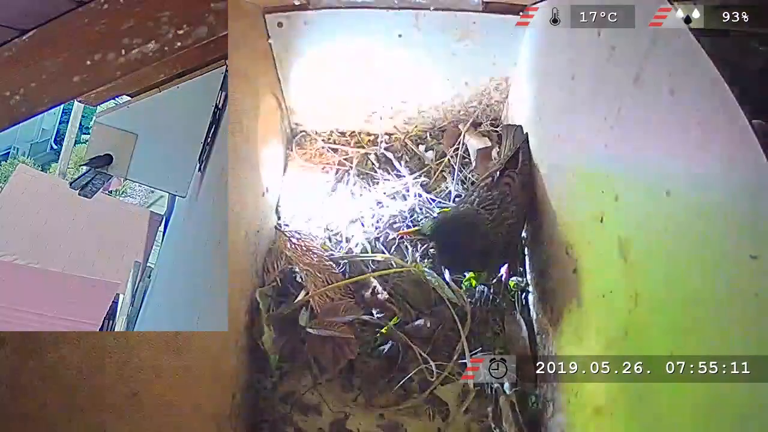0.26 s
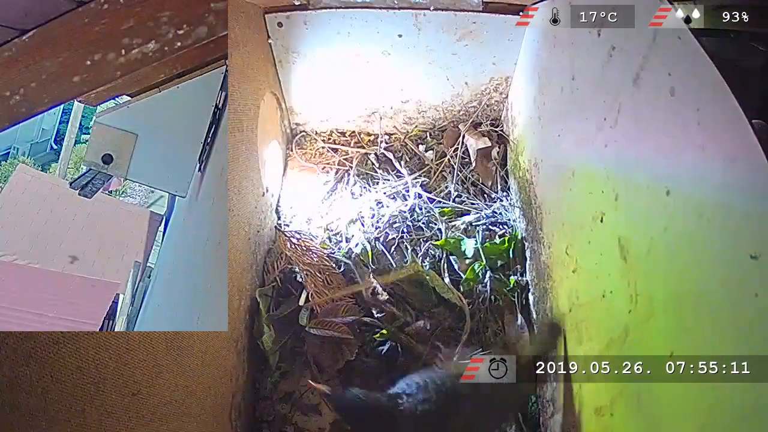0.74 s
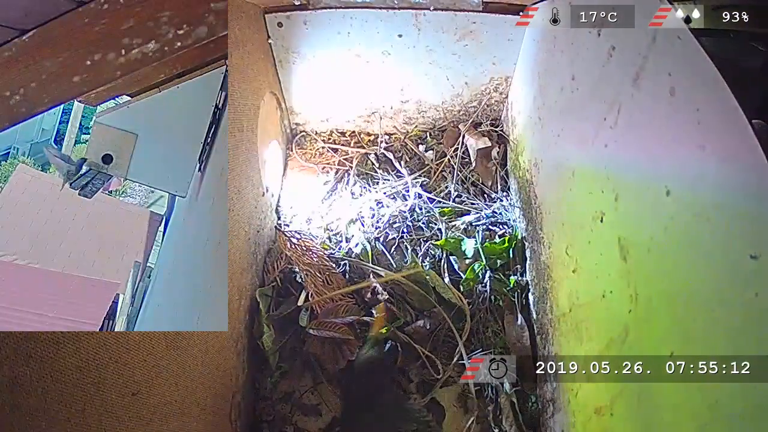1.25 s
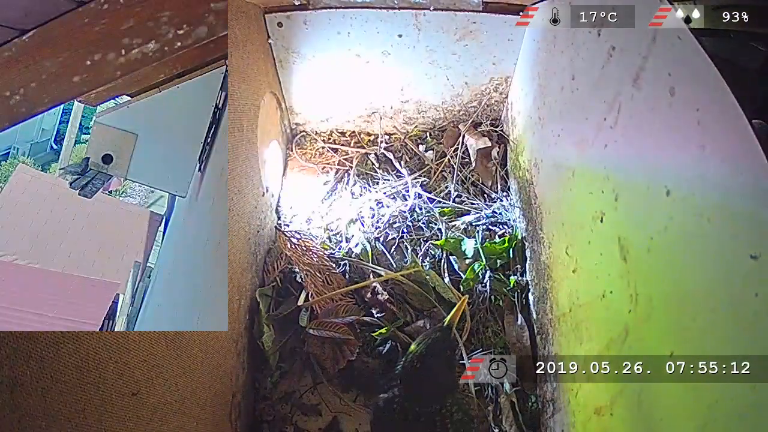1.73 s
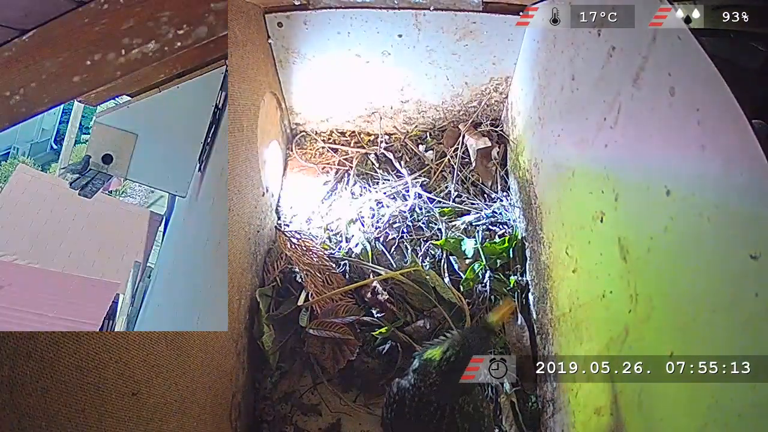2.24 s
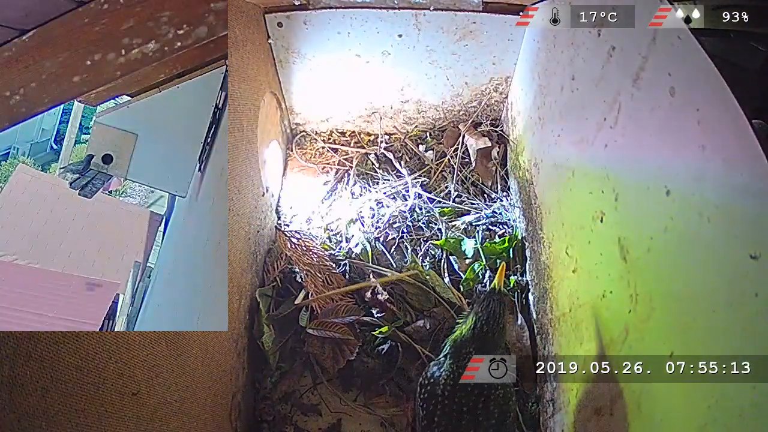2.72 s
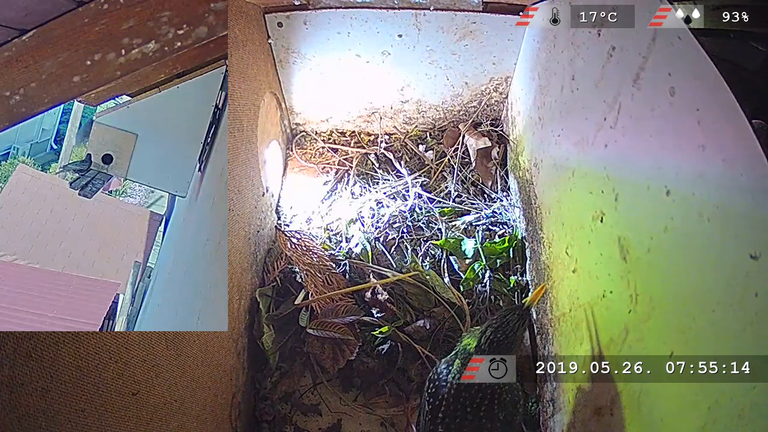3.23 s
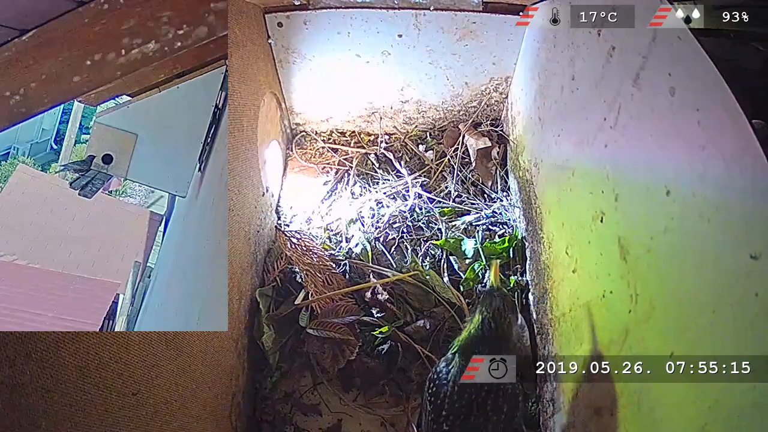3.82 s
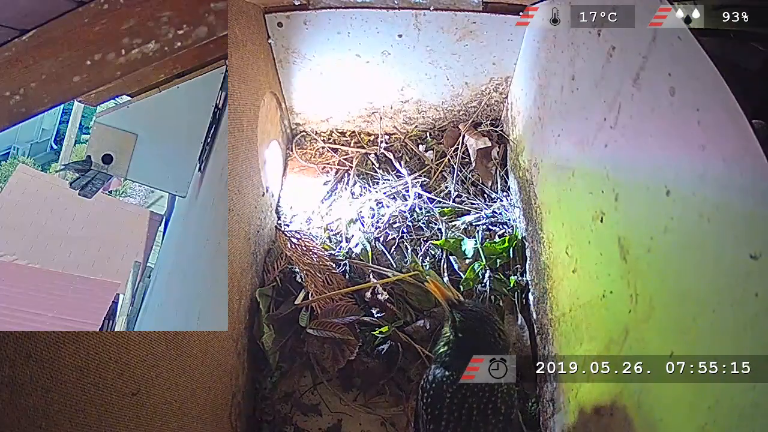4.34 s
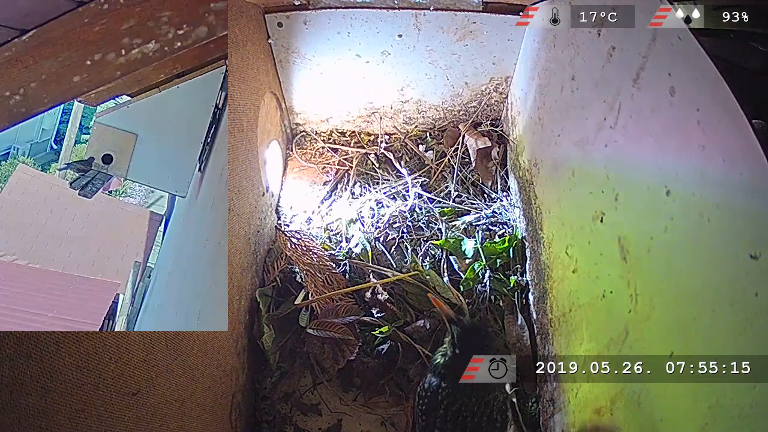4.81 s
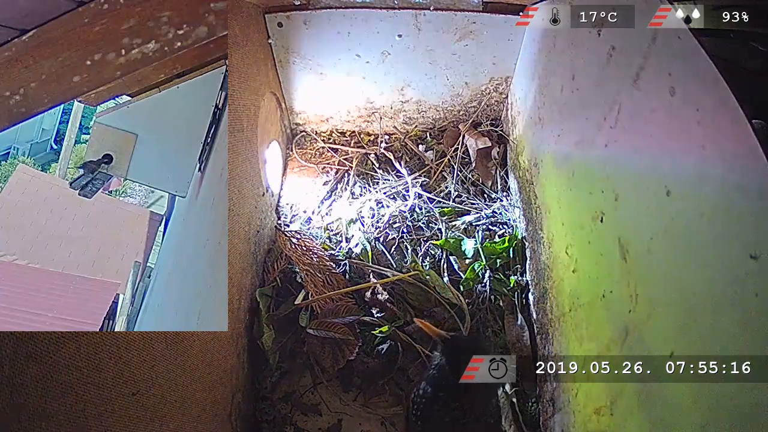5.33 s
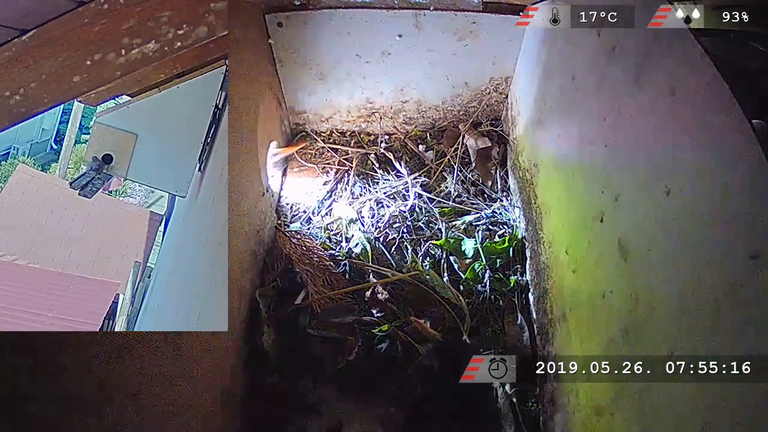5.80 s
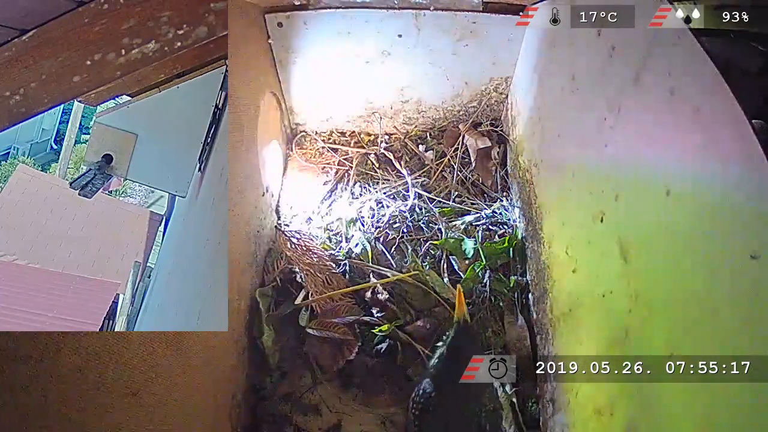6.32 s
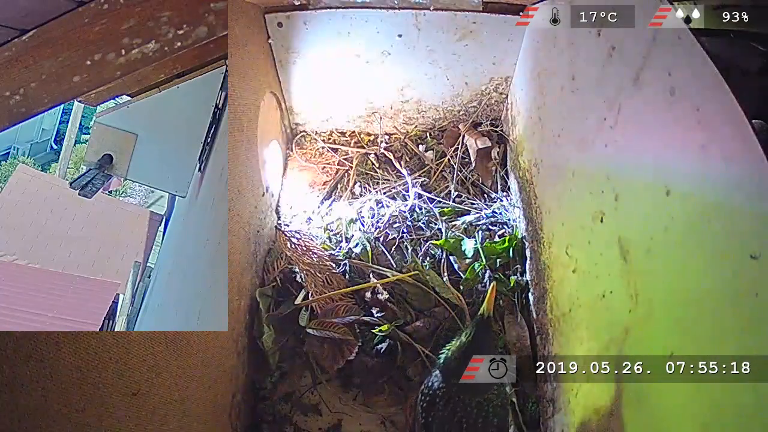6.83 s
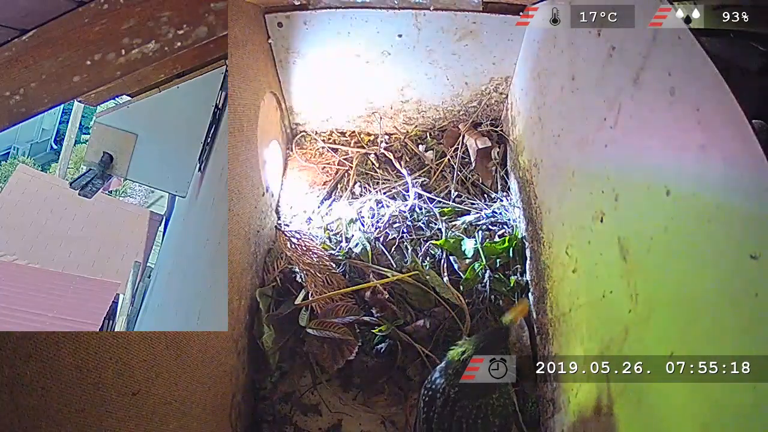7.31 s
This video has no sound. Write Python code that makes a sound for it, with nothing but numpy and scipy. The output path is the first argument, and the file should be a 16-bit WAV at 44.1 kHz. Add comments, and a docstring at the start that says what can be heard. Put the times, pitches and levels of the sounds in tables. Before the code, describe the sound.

Close in a small wooden box, a starling whistles long and loud, then breaks into chattering chirps, clucks, quacks, rasps and a screech.

```python
"""A clear whistle rises out of faint outdoor noise and low box rumble: a starling sings inside a wooden nest box.
The two sides of its syrinx are gliding near-sines; fast flutter makes buzzes and shaken pitch makes rough notes.
Snaps and air noise ring resonances for rasps; short pushes ring clucks and steps; random ticks make rustles.
The box adds a very short ring, and its standing waves make gliding notes dip.
The loudest notes overload the box camera's input, which flattens, crackles, fizzes and thumps."""
import sys
import numpy as np
from scipy import signal
from scipy.fft import rfft, irfft
from scipy.io import wavfile
from scipy.ndimage import uniform_filter1d

SR = 44100
rng = np.random.default_rng(int(sys.argv[2]) if len(sys.argv) > 2 else 0)


def to_wav(sig):
    """Store sig (one row per channel, or 1-D mono) as 16-bit WAV at the path in sys.argv[1].

    Samples outside -1..1 are clipped; the rate is SR.
    """
    pcm = np.clip(np.atleast_2d(sig), -1, 1) * 32767
    pcm = np.round(pcm).astype(np.int16)
    wavfile.write(sys.argv[1], SR, pcm.T)  # frames by channels


N = 333396
T = np.arange(N) / SR


def undb(db):
    """Decibels to gain."""
    return 10 ** (np.asarray(db) / 20)


def unit(x):
    """Scale to rms 1."""
    return x / np.sqrt(np.mean(x ** 2) + 1e-18)


def wander(count, rate_hz):
    """Low-passed random motion of rms 1."""
    sos = signal.butter(2, min(rate_hz, SR / 4), fs=SR, output="sos")
    return unit(signal.sosfilt(sos, rng.standard_normal(count)))


def colour(hz, points):
    """Gain at the given frequencies from a (hz, db) curve."""
    point_hz, point_db = np.transpose(points)
    return undb(np.interp(np.log(hz + 1), np.log(point_hz), point_db))


def resonate(x, modes):
    """Parallel resonances; alternate signs keep the valleys between them free of notches."""
    total = 0
    for k, (hz, width_hz, db) in enumerate(modes):
        b, a = signal.iirpeak(hz, hz / width_hz, fs=SR)
        total = total + (-1) ** k * undb(db) * signal.lfilter(b, a, x)
    return total


def gesture(rows):
    """Sample a note's rows: times, a 3 ms fade at both ends, then each column."""
    row_s, *columns = np.transpose(rows)
    t = T[(T >= row_s[0]) & (T <= row_s[-1])]
    fade = np.clip(np.minimum(t - t[0], t[-1] - t) / .003, 0, 1)
    return (t, fade, *(np.interp(t, row_s, c) for c in columns))


def figure(shape, start_s, length_s, pitch_factor, level_db):
    """One rendition of a repeated figure: moved, stretched, transposed and made louder or softer."""
    return np.multiply(shape, (length_s, pitch_factor, 1)) + (start_s, 0, level_db)


def place(t, x):
    """Lay a note into silence at its own time."""
    return np.pad(x, (round(t[0] * SR), N))[:N]


def phase_of(hz):
    """Running phase of a moving pitch."""
    return 2 * np.pi * np.cumsum(hz) / SR


def swells(rows):
    """Gain that rises to each row's level and dies away again, exponentially both ways."""
    return sum(undb(level_db) * np.exp(-np.abs(T - peak_s) / rise_fall_s)
               for peak_s, level_db, rise_fall_s in rows)


BOX_T60_S, BOX_LATE_T60_S, BOX_LATE_DB = 0.067, 0.16, -26


def in_box(x, wet_db):
    """Direct sound plus the dense, quickly dying reflections of the box."""
    t = T[:SR // 4]
    decay = undb(-60 * t / BOX_T60_S) + undb(BOX_LATE_DB - 60 * t / BOX_LATE_T60_S)
    ring = rng.standard_normal(len(t)) * decay * (t > .001)
    ring /= np.linalg.norm(ring)
    wet = undb(wet_db)
    return (x + wet * signal.fftconvolve(x, ring)[:N]) / np.hypot(1, wet)


# outdoor noise and microphone hiss, relative spectrum: freq_hz, density_db
BACKGROUND_SPECTRUM = [(18, -39), (30, -8), (87, 1.5), (330, -15.5), (520, -7.5), (952, -20.5), (1320, -27),
                       (1620, -20.5), (1930, -20.5), (2890, -31), (3200, -23), (5570, -32), (12500, -32.5),
                       (16200, -65), (22000, -120)]
# rumble as the bird moves about: peak_s, level_db, rise_fall_s
STIRS = [(.1, -61.5, .4), (1.41, -36.5, .14), (7.54, -37.5, 0.075)]
BACKGROUND_DB, RUMBLE_REST_DB = -58, -74


def background():
    """Faint, swelling shaped noise, and noise through two low resonances for the rumble of the box."""
    bin_hz = np.arange(N // 2 + 1) * SR / N
    spectrum = rfft(rng.standard_normal(N)) * colour(bin_hz, BACKGROUND_SPECTRUM)
    air = unit(irfft(spectrum, N))
    rumble = resonate(rng.standard_normal(N), [(47.4, 13, 0)])
    rumble = unit(resonate(rumble, [(48, 130, 0)]))
    swell = undb(2 * wander(N, 4))
    return air * swell * undb(BACKGROUND_DB) + rumble * (undb(RUMBLE_REST_DB) + swells(STIRS))


# standing-wave nulls of the box: centre_hz, width_hz, depth_db
BOX_NULLS = [(2333.6, 45, -21), (3138, 42, -15.5), (3477, 32, -15), (3920, 48, -23.5), (4010, 8.8, -13),
             (4184, 24, -3), (4312, 25, -16.5), (4615, 55, -25), (5722, 67, -7.5), (5880, 71, -10),
             (6604, 70, -12), (8280, 120, -17)]


def nulls_db(hz):
    """Level lost to the box's standing waves at each pitch."""
    return sum(db / (1 + (2 * (hz - centre_hz) / width_hz) ** 2) for centre_hz, width_hz, db in BOX_NULLS)


# a restless share of each whistle is scattered by the nest and fills the nulls
SCATTER_DB, SCATTER_HZ = -23.5, 60


def whistle(rows, second_db=-36, half_db=-90, flutter=0.036, flutter_hz=370, jitter=.0015,
            waver_db=0, waver_hz=22):
    """One side of the syrinx: a near sine; flutter adds sidebands, period doubling adds half lines."""
    t, fade, hz, db = gesture(rows)
    beat = phase_of(flutter_hz * (1 + 0.3 * wander(len(t), 120)))
    phase = phase_of(hz * (1 + jitter * wander(len(t), 200))) + flutter * np.sin(beat)
    third = 0.31 * (3 * hz < SR / 2) * np.sin(3 * phase)
    tone = np.sin(phase) + undb(second_db) * (np.sin(2 * phase) + third)
    tone += undb(half_db) * (np.sin(phase / 2) + .2 * np.sin(3 * phase / 2))
    level_db = db + waver_db * np.minimum(wander(len(t), waver_hz), 1)
    path = undb(nulls_db(hz)) + undb(SCATTER_DB) * wander(len(t), SCATTER_HZ)
    flutter_gain = 1 + .5 * flutter * np.sin(beat + 1)
    return place(t, np.sqrt(2) * tone * fade * undb(level_db) * path * flutter_gain)


# pure whistles, one curve a note, levels before the nulls: time_s, pitch_hz, level_db
LONG_WHISTLE = [(0, 2450, -55), (.07, 2700, -43.5), (.1, 2975, -29.5), (.125, 3178, -31.5),
                (.21, 3338, -31), (.28, 3270, -19.5), (.335, 3230, -13), (.42, 3178, -20), (.56, 3089, -18),
                (.62, 3072, -13.4), (.7, 3060, -13.9), (.82, 3040, -18), (.93, 3012, -16),
                (1.04, 3022, -18.5), (1.075, 3030, -61)]
SLIDE = [(1.55, 4900, -55), (1.57, 4730, -22.5), (1.6, 4693, -14.5), (1.7, 4370, -13.5),
         (1.83, 4102, -13.5), (1.89, 3980, -17.5), (1.915, 4048, -20.5), (1.93, 4190, -34.5),
         (2.065, 4254, -44), (2.09, 4120, -66.5)]
ARCH = [(2.29, 5440, -69), (2.386, 5650, -27), (2.485, 6300, -24.5), (2.55, 7744, -24), (2.605, 8725, -32),
        (2.65, 7800, -16.5), (2.696, 6460, -14.5), (2.751, 5530, -15.5), (2.81, 5004, -16),
        (2.837, 4963, -38.5), (2.87, 4980, -40.5)]
LEAD_IN = [(3.215, 5360, -68), (3.249, 5640, -36), (3.289, 5450, -29.5), (3.335, 5710, -33)]
LAST_WHISTLE = [(7.43, 3300, -51), (7.452, 3280, -30), (7.47, 3440, -22), (7.515, 3600, -17.5),
                (7.53, 3600, -16.5), (7.56, 3180, -26)]


def whistles():
    """The clear single notes: near-sines with weak harmonics and slight flutter."""
    song = whistle(LONG_WHISTLE, second_db=-39, flutter=0.027, jitter=.0012)
    song += whistle(SLIDE, second_db=-28.0)
    song += whistle(ARCH, second_db=-25.5, flutter=0.12)
    song += whistle(LEAD_IN, second_db=-24.5, flutter=0.25)
    return song + whistle(LAST_WHISTLE, second_db=-35.5)


# twigs and leaves shift under the bird: peak_s, level_db, rise_fall_s
RUSTLES = [(.15, -52.5, 0.18), (1.43, -54.5, 0.27), (4.2, -63.5, 0.27), (6.33, -65.5, 0.29)]
# their resonances: freq_hz, width_hz, gain_db
TWIG_MODES = [(500, 220, 0.5), (900, 420, -2), (3180, 1100, -13), (9500, 5000, -15.5)]


def rustle(ticks_per_s=500, scatter_db=5):
    """Dry nest material: random ticks of either sign ring broad resonances as the bird shifts."""
    tick_db = scatter_db * np.minimum(rng.exponential(size=N), 4)
    ticks = (rng.random(N) < ticks_per_s / SR) * undb(tick_db)
    return unit(resonate(ticks * rng.choice([-1, 1], N), TWIG_MODES)) * swells(RUSTLES)


def rough_note(rows, second_db, jitter, shimmer):
    """A tone that turns chaotic: pitch and strength shake, and the octave grows with the roughness."""
    t, fade, hz, db, rough = gesture(rows)
    phase = phase_of(hz * (1 + jitter * rough * wander(len(t), 350)))
    overtones = np.sin(2 * phase) + 0.17 * np.sin(3 * phase)
    tone = np.sin(phase) + undb(second_db) * (rough + 0.088) * overtones
    shake = (1 + shimmer * rough * wander(len(t), 450)) / np.hypot(1, shimmer * rough)
    return place(t, np.sqrt(2) * tone * shake * fade * undb(db))


# soft notes of the second voice, one list a note: time_s, pitch_hz, level_db, roughness
ASIDES = [
    [(.078, 4080, -47.5, 0.3), (.102, 5570, -39.5, 0), (.135, 6850, -70, .2)],
    [(.185, 4500, -59, .5), (.2, 3500, -37.5, 0.4), (.24, 2300, -48, 0.7), (.33, 1450, -45, .8)],
    [(.825, 1840, -45, 0.1), (.87, 1785, -55.5, .3)],
    [(1.015, 1806, -54.5, 0.05), (1.06, 1740, -45.5, 0.42)],
    [(2.607, 5060, -28, 0.1), (2.62, 4655, -21, 0.06), (2.645, 3920, -35, 0.7), (2.665, 3300, -41.5, 0.4),
     (2.72, 2000, -44, 0.15), (2.82, 1080, -55, 0.12)],
]


def asides():
    """Soft rough notes from the other side of the syrinx, under the whistles."""
    return sum(rough_note(rows, second_db=-35, jitter=.035, shimmer=.8) for rows in ASIDES)


# air through the syrinx, one list a wheeze: time_s, centre_hz, level_db
WHEEZES = [
    [(.24, 4710, -65), (.34, 4525, -39.5), (.5, 4464, -62), (.62, 4300, -45)],
    [(.08, 3000, -60), (.33, 3093, -42.5), (.6, 3030, -59), (1.05, 3045, -66)],
    [(1.09, 4265, -53), (1.19, 4535, -35), (1.38, 3084, -42), (1.45, 2940, -61)],
]


def wheezes(cutoff_hz=650):
    """Low-passed noise on a gliding carrier: a band of hiss that slides along beside a whistle."""
    song = np.zeros(N)
    for rows in WHEEZES:
        t, fade, hz, db = gesture(rows)
        hiss = unit(wander(len(t), cutoff_hz) * np.sin(phase_of(hz)))
        song += place(t, fade * undb(db) * hiss)
    return song


def knock(start_s, peak_db, decay_s, grit, modes):
    """A push with a gritty tail rings a set of resonances."""
    t = T[:SR // 4]
    push = grit * rng.standard_normal(len(t)) * np.exp(-t / decay_s)
    push[0] += 1
    ring = resonate(push, modes)
    return place(t + max(start_s, 0), undb(peak_db) * ring / np.abs(ring).max())


# clucks, relative level: start_s, relative_db
CLUCKS = [(.158, -58), (.414, -46), (3.118, -46), (3.203, -41.5), (3.946, -51.5), (4.056, -50.5),
          (4.337, -54.5), (4.374, -48.5), (4.662, -50), (4.822, -44.5), (4.867, -48.5), (4.996, -43.5),
          (5.132, -56.5), (7.189, -44.5), (7.391, -52)]
# throat resonances of a cluck: freq_hz, width_hz, gain_db
CLUCK_MODES = [(493, 133, 3.5), (920, 254, -3.5), (1360, 36, -7.5), (1710, 570, -15.5), (2730, 440, -21)]


def clucks():
    """Dry clucks: short gritty pushes ring the throat."""
    return undb(19.5) * sum(knock(s, db, decay_s=.004, grit=.12, modes=CLUCK_MODES) for s, db in CLUCKS)


# two-voice note, one curve a side of the syrinx, before the nulls: time_s, pitch_hz, level_db
DUET_LOW = [(1.165, 3130, -44), (1.184, 3330, -32), (1.39, 3690, -32), (1.435, 3824, -23),
            (1.48, 3975, -25), (1.524, 4070, -61.5)]
DUET_HIGH = [(1.165, 5100, -53.5), (1.181, 5350, -41), (1.274, 5920, -31.5), (1.414, 6250, -37.5),
             (1.464, 6670, -52)]


def duet(coupling=7):
    """Both sides sound at once and modulate each other, which adds their sum tone."""
    low = whistle(DUET_LOW, second_db=-19.5)
    high = whistle(DUET_HIGH, second_db=-10.5)
    highpass = signal.butter(4, 6000, "high", fs=SR, output="sos")
    sum_tone = signal.sosfilt(highpass, low * high)
    return low + high + coupling * sum_tone


# feet on the nest floor, relative level: start_s, relative_db
STEPS = [(1.343, -58.5), (1.411, -52.5), (1.475, -34), (1.5, -46), (1.56, -45), (2.178, -41.5),
         (5.349, -52.5), (5.64, -38.5), (5.658, -41.5), (6.317, -43.5)]
# floor resonances: freq_hz, width_hz, gain_db
FLOOR_MODES = [(73.5, 3.8, 7.5), (158, 21, -10.5), (393, 87, -7.5), (521, 110, -8), (835, 170, -19.5),
               (2860, 2000, -34.5)]


def steps():
    """Feet scuffing the nest floor: longer, grittier pushes ring the floor."""
    return undb(12.5) * sum(knock(s, db, decay_s=.016, grit=.3, modes=FLOOR_MODES) for s, db in STEPS)


WARBLE_BEAT_S, WARBLE_ACCENT_DB, WARBLE_EDGE_DB = .0317, 20, -5
# a warble scoops in from below and drops away again
SCOOP_S, SCOOP_HZ, SCOOP_DB = .042, 388, -35


def warble(first_s, last_s, hz, swing_hz, db, unsteady):
    """A low whistle flicks upward and louder on each beat, strongest mid-way, with a scoop at both ends."""
    t = T[(T > first_s - SCOOP_S) & (T < last_s + SCOOP_S)]
    inside = np.clip(t, first_s, last_s)
    near_beats = np.abs(t - inside) < WARBLE_BEAT_S / 2
    flick = np.cos(np.pi * (t - first_s) / WARBLE_BEAT_S) ** 2 * near_beats
    scoop = ((t - inside) / SCOOP_S) ** 2
    edge = (2 * (inside - first_s) / (last_s - first_s) - 1) ** 2
    accent_db = WARBLE_ACCENT_DB * (1 - unsteady) * (flick - .5)
    level_db = db + accent_db + WARBLE_EDGE_DB * edge + SCOOP_DB * scoop ** 2
    swing = swing_hz * (flick ** 2 + .25 * unsteady * wander(len(t), 90))
    rows = np.column_stack([t, hz + swing - SCOOP_HZ * scoop, level_db])
    return whistle(rows, second_db=-44, flutter=0.084, jitter=0.0021, waver_db=6 * unsteady, waver_hz=90)


# warbles: first_beat_s, last_beat_s, base_pitch_hz, upward_swing_hz, base_level_db, unsteadiness (0-1)
WARBLES = [(1.574, 1.689, 2136, 463, -34, .8), (1.963, 2.058, 2020, 315, -16.5, .1),
           (2.28, 2.35, 1920, 316, -25.5, 0.63)]


def warbles():
    """Short warbles from the low side of the syrinx."""
    return sum(warble(*row) for row in WARBLES)


# one falling buzz, before its factors: share_of_length, base_pitch_hz, relative_db
BUZZ = [(0, 4820, -24), (.23, 4450, -9), (.38, 3970, -3), (.53, 3600, 3), (.75, 3390, -1), (1, 3160, -23)]
# renditions: start_s, length_s, pitch_factor, added_db
BUZZES = [(2.85, 0.2, 0.98, -28.5), (4.47, .19, 0.98, -23), (5.104, 0.24, 0.99, -22.5)]


def buzzes():
    """Falling notes with a fast, uneven flutter."""
    return sum(whistle(figure(BUZZ, *row), second_db=-32, flutter=.38, flutter_hz=320, jitter=.004)
               for row in BUZZES)


# one low quack, before its factors: share_of_length, base_pitch_hz, relative_db
QUACK = [(0, 1072, -21), (.14, 700, -5), (.28, 565, 2.5), (.45, 568, 5), (.72, 610, 2.5), (.88, 777, -2.5),
         (1.15, 711, -16)]
# renditions: start_s, length_s, pitch_factor, added_db, roughness
QUACKS = [(3.126, 0.086, 1.18, -38, 0.22), (4.392, 0.073, 0.98, -35, 0.06),
          (4.675, 0.1, 1.017, -34.5, 0.05), (4.838, .1, 1, -33, 0.04), (5.015, 0.084, 0.98, -31.5, 0.02)]
# what the throat passes: freq_hz, gain_db
THROAT = [(430, -28), (570, 1), (640, -13), (770, -23), (1150, -5), (1420, 6), (1650, -19.5), (1850, -3),
          (2080, -15.5), (2330, -7.5), (3300, -25.5), (4200, -38), (4700, -23.5), (7000, -65)]


def quacks(count=12):
    """Low harmonic notes that dip and rise under fixed throat resonances."""
    song = np.zeros(N)
    for *rendition, rough in QUACKS:
        t, fade, hz, db = gesture(figure(QUACK, *rendition))
        phase = phase_of(hz * (1 + 0.35 * rough * wander(len(t), 380)))
        voice = sum(colour(k * hz, THROAT) * np.sin(k * phase) for k in range(1, count + 1))
        song += place(t, voice * fade * undb(db) * (1 + rough * wander(len(t), 400)))
    return song


def rattle(count, rate_hz, scatter, air, modes):
    """Uneven snaps of the syrinx and some air noise ring the throat; filtered twice for steep skirts."""
    chance = rng.standard_normal((count // 20, 2))
    gaps = SR / rate_hz * np.exp(scatter * chance[:, 0])
    snap_at = np.cumsum(gaps).astype(int)
    snaps = np.bincount(snap_at, undb(2.8 * chance[:, 1]), count)[:count]
    drive = unit(snaps) + air * rng.standard_normal(count)
    total = 0
    for hz, width_hz, db in modes:
        mode = [(hz, 2 * width_hz, 0)]
        total = total + undb(db) * resonate(resonate(drive, mode), mode)
    return unit(total)


# rasps: start_s, loudest_s, end_s, level_db, mode_pitch_factor
RASPS = [(5.738, 5.795, 5.83, -18, 0.982), (5.946, 6.005, 6.06, -18.5, 0.96),
         (7.003, 7.055, 7.095, -13, 0.98), (7.218, 7.275, 7.35, -18, 0.98),
         (3.165, 3.182, 3.225, -25.5, .73)]
# throat resonances, before the pitch factor: base_freq_hz, half_width_hz (of each filter pass), gain_db
RASP_MODES = [(1387, 470, -21), (2740, 163, -2), (2876, 140, -6.5), (3950, 670, -21), (8300, 490, -33.5)]


def rasps(edge_db=-19):
    """Short swelling rasps: rattles whose throat resonances shift with the pitch factor."""
    song = np.zeros(N)
    for start_s, top_s, end_s, level_db, pitch in RASPS:
        swell = [(start_s, edge_db), ((start_s + top_s) / 2, -6), (top_s, 0), (end_s, edge_db - 13)]
        t, fade, db = gesture(swell)
        modes = np.multiply(RASP_MODES, (pitch, 1, 1))
        rasp = rattle(len(t), rate_hz=260, scatter=0.28, air=0.67, modes=modes)
        song += place(t, fade * undb(db + level_db) * rasp)
    return song


# yelp, before the nulls: time_s, pitch_hz, level_db
YELP = [(3.298, 3122, -38), (3.32, 2820, -28), (3.34, 2854, -13.5), (3.39, 3293, -14), (3.424, 3606, -24),
        (3.442, 3590, -18.5), (3.467, 3097, -11.5), (3.495, 2140, -13.5), (3.51, 1840, -32)]


def yelp():
    """A loud gliding whistle with period doubling."""
    return whistle(YELP, second_db=-27, half_db=-17.5, flutter=0.069, jitter=0.0067)


# one falling chirp, before its factors: time_after_start_s, base_pitch_hz, base_level_db, base_roughness
CHIRP = [(0, 3942, -36.5, 0.5), (.012, 3099, -23, .1), (.022, 2941, -21.5, 0.11), (.031, 2896, -18.5, 0.1),
         (.039, 2400, -17, .9), (.05, 1982, -41, 1.5)]
# renditions: start_s, pitch_factor, added_db, added_roughness
CHIRPS = [(3.51, 0.95, 1, 0), (3.612, 1.01, 4.5, 0.4), (3.66, 1.065, -0.5, 0.01), (3.705, .99, 2.5, 0.17),
          (3.752, .99, 0.5, 0.15), (3.803, 0.98, -0.5, 0.21), (3.853, 0.95, -11.5, 0)]


def chirps():
    """A fast run of falling rough notes, each breaking up at its end."""
    song = np.zeros(N)
    for start_s, pitch, db, rough in CHIRPS:
        rows = np.multiply(CHIRP, (1, pitch, 1, 1)) + (start_s, 0, db, rough)
        song += rough_note(rows, second_db=-4.5, jitter=.06, shimmer=0.604)
    return song


# bright nasal squeak: time_s, pitch_hz, relative_db
SQUEAK = [(3.572, 919, -28), (3.588, 1154, -16.5), (3.6, 1210, -14.5), (3.622, 1270, -43)]
# its harmonics: multiple, gain_db
SQUEAK_HARMONICS = [(1, -20.5), (2, -14), (3, -4.5), (4, -1), (5, -17)]


def squeak():
    """Harmonics of one shaky pitch, the third and fourth strongest."""
    t, fade, hz, db = gesture(SQUEAK)
    phase = phase_of(hz * (1 + 0.03 * wander(len(t), 500)))
    voice = sum(undb(gain_db) * np.sin(round(k) * phase) for k, gain_db in SQUEAK_HARMONICS)
    return place(t, fade * undb(db) * voice)


# rough swoop up, down and up again: time_after_start_s, pitch_hz, base_level_db, roughness
SWOOP = [(0, 1400, -50.5, 0.68), (.027, 2702, -25, 0.2), (.05, 3330, -32.5, 0.11), (.066, 3095, -16, .3),
         (.085, 2350, -29, .8), (.122, 1403, -52, 0.62), (.152, 1547, -48.5, .4), (.185, 2850, -22.5, .75),
         (.218, 4358, -18.5, 0.29), (.248, 4465, -27.5, .17), (.275, 4570, -66, .1)]
# renditions: start_s, added_db
SWOOPS = [(5.411, 0.9), (6.672, 2.5)]


def swoops():
    """The same rough swooping figure opens both closing phrases."""
    return sum(rough_note(np.add(SWOOP, (s, 0, db, 0)), second_db=-14, jitter=0.027, shimmer=0.67)
               for s, db in SWOOPS)


# high descant of a closing phrase, before its factors: share_of_length, base_pitch_hz, base_level_db
DESCANT = [(0, 7842, -69), (.09, 6950, -43.5), (.19, 6550, -38.5), (.265, 6230, -29.5), (.44, 5914, -33.5),
           (.5, 5804, -36.5), (.59, 5586, -28.5), (.66, 5605, -34), (.74, 5575, -35.5), (.8, 5530, -52),
           (.85, 5450, -33.5), (.955, 5294, -29), (1, 5320, -55.5)]
# renditions: start_s, length_s, pitch_factor, added_db
DESCANTS = [(5.417, .66, 1, 0.5), (6.683, .693, 0.98, 4.5)]


def descants():
    """A high, falling whistle of wavering level over each closing phrase."""
    return sum(whistle(figure(DESCANT, *row), second_db=-25, flutter=0.12, waver_db=5.0)
               for row in DESCANTS)


# screech: time_s, level_db
SCREECH = [(6.446, -41), (6.453, -17.5), (6.5, -15.5), (6.565, -12.5), (6.58, -20.5), (6.6, -75)]
# its throat resonances: freq_hz, half_width_hz (of each filter pass), gain_db
SCREECH_MODES = [(1870, 420, -13), (2480, 130, 2), (2970, 210, -4), (3162, 620, -2), (4074, 220, -10.5)]


def screech():
    """One loud, fast rattle of the syrinx through fixed throat resonances."""
    t, fade, db = gesture(SCREECH)
    voice = rattle(len(t), rate_hz=600, scatter=.3, air=0.4, modes=SCREECH_MODES)
    return place(t, fade * undb(db) * voice)


def scene():
    """Clear notes reach the microphone almost directly; the rough, fast ones are smeared by the box."""
    clear = in_box(whistles() + duet() + descants(), wet_db=-21.5) + in_box(warbles(), wet_db=-12)
    chatter = yelp() + chirps() + squeak()
    rough = buzzes() + swoops() + chatter + rasps() + screech() + asides() + wheezes()
    low = quacks() + clucks() + steps() + rustle()
    return (clear + in_box(rough, wet_db=-3) + in_box(low, wet_db=-4.5) + background())[None]


TOP_HZ = 12500
# amplitudes, full scale 1; CRACKLE_FROM and FIZZ_FROM apply to the treble-boosted drive
CEILING, CRACKLE_FROM, CRACKLE_SPAN, CRACKLE_SIZE = 0.24, .235, .32, 0.33
FIZZ_FROM, FIZZ_DB = 0.23, -11
# THUMP_FROM: rms change per sample
THUMP_FROM, THUMP_DB = 0.1, -8


def record(dry, clock_hz=3945, clock_db=-31):
    """The camera's converter: a wobbling clock, flattened peaks that crackle and thump, and a cut top."""
    # clock wobble puts faint side tones around each whistle, stronger for high ones
    wobble = undb(clock_db) * np.sin(2 * np.pi * clock_hz * T)
    x = dry + np.gradient(dry, axis=1) * wobble
    # high notes overload first
    drive = x - .5 * np.gradient(np.gradient(x, axis=1), axis=1)
    # positive peaks snap back in clusters, more often the harder they are driven
    overload = np.maximum(drive - CRACKLE_FROM, 0) / CRACKLE_SPAN
    chance = overload ** 2 * undb(8.6 * wander(N, 120))
    snaps = rng.random(x.shape) < np.minimum(chance, .5)
    loud = np.clip(x, -CEILING, CEILING) - CRACKLE_SIZE * snaps
    fizz = undb(FIZZ_DB) * np.clip(drive - FIZZ_FROM, 0, .1) * rng.standard_normal(N)
    # loud high notes thump
    slew = np.sqrt(np.abs(uniform_filter1d(np.gradient(x, axis=1) ** 2, size=220)))
    thump = undb(THUMP_DB) * np.maximum(slew - THUMP_FROM, 0) * wander(N, 300)
    lowpass = signal.ellip(10, .2, 80, TOP_HZ, fs=SR, output="sos")
    return signal.sosfilt(lowpass, loud + fizz + thump)


dry = scene()
out = record(dry)
to_wav(out)
```